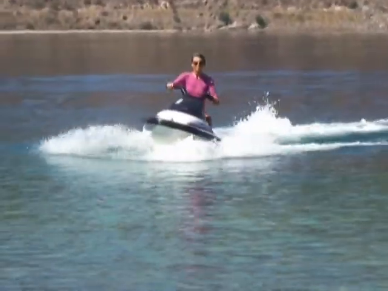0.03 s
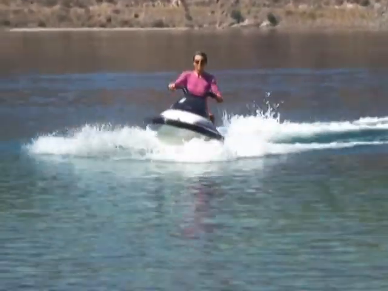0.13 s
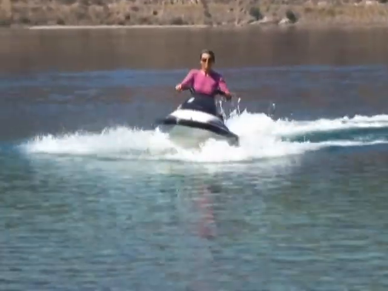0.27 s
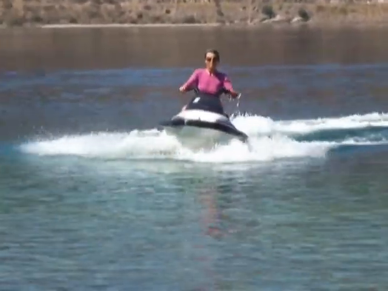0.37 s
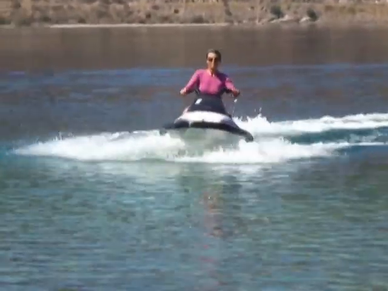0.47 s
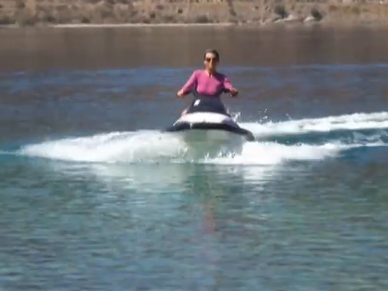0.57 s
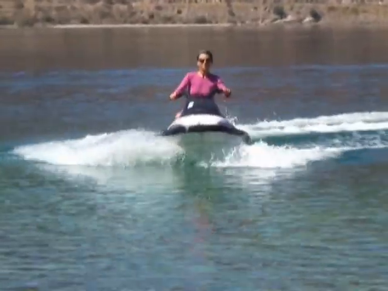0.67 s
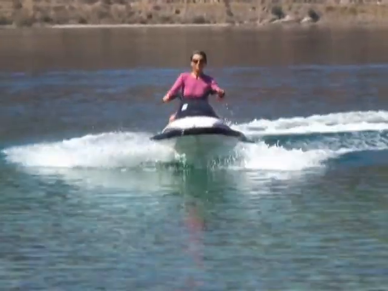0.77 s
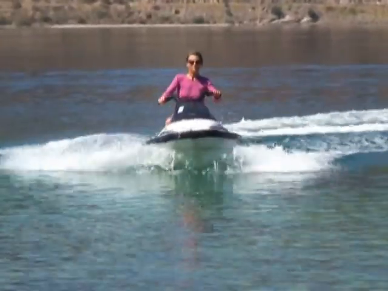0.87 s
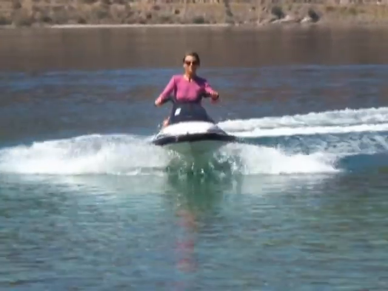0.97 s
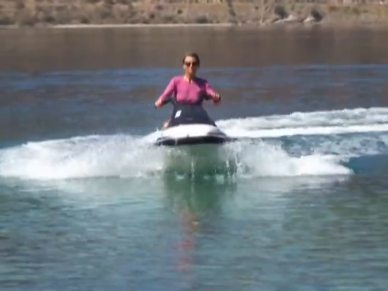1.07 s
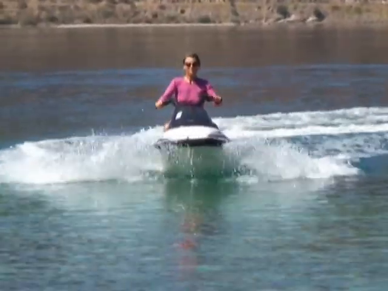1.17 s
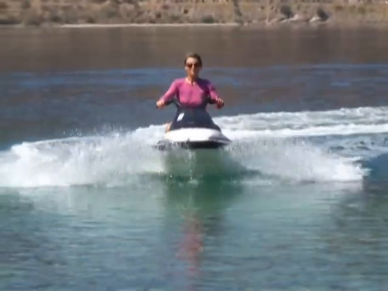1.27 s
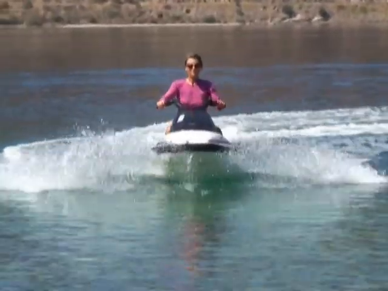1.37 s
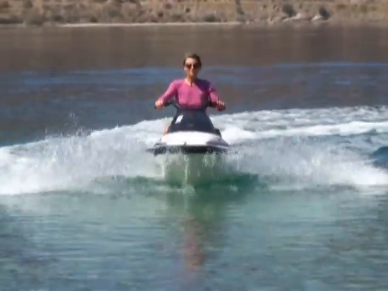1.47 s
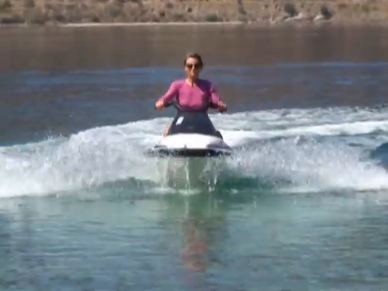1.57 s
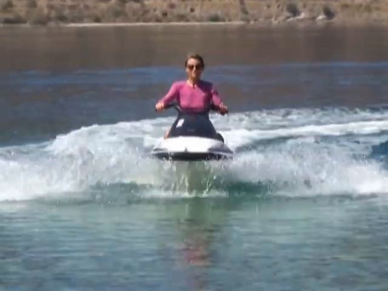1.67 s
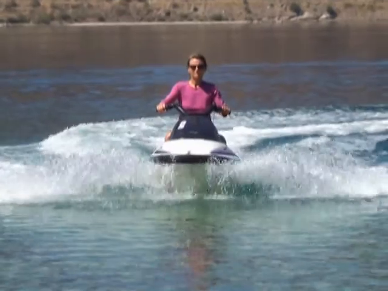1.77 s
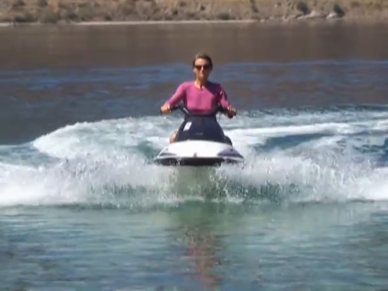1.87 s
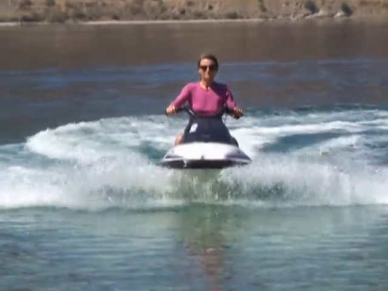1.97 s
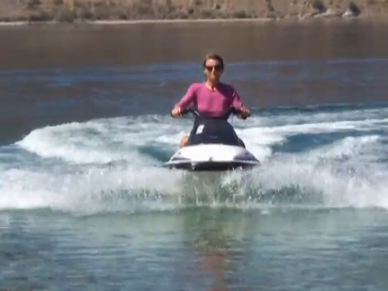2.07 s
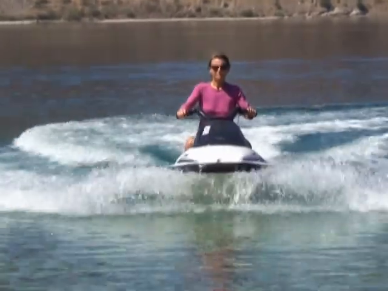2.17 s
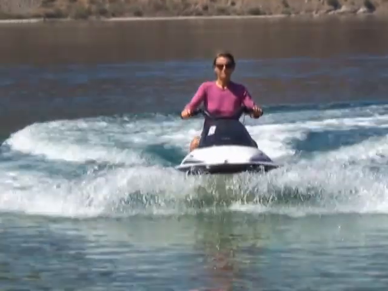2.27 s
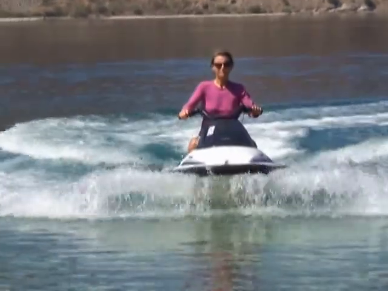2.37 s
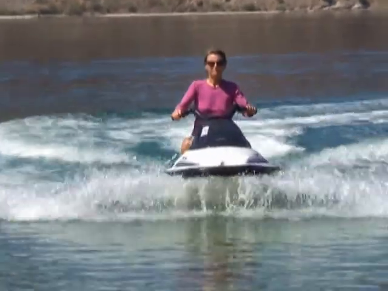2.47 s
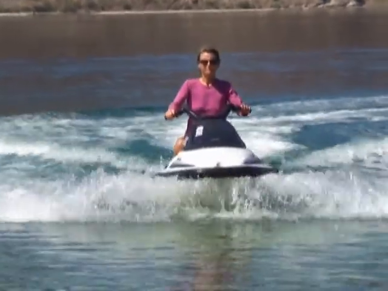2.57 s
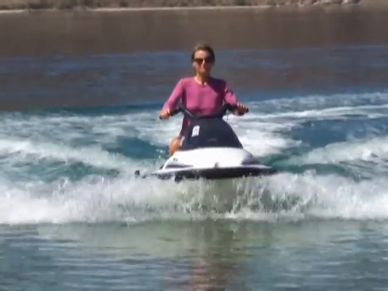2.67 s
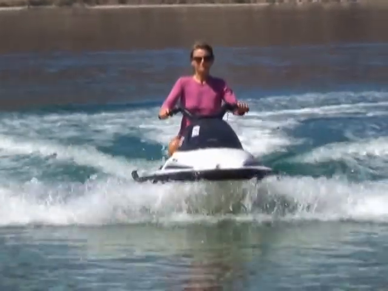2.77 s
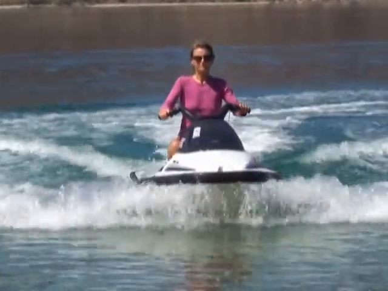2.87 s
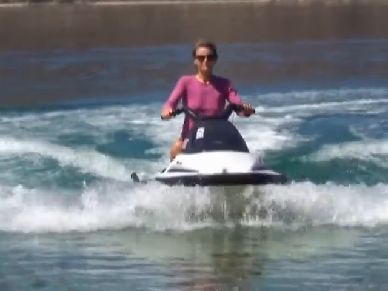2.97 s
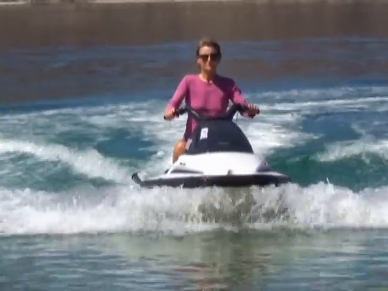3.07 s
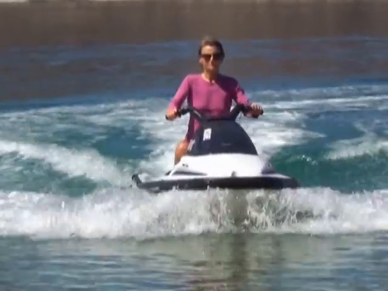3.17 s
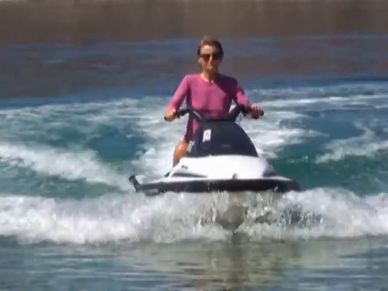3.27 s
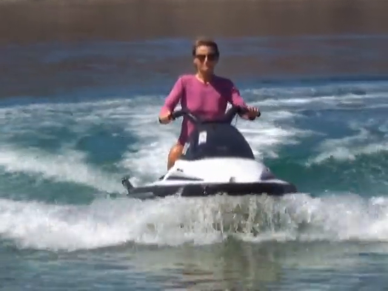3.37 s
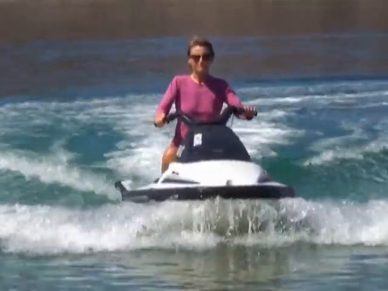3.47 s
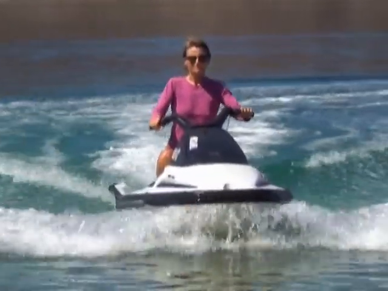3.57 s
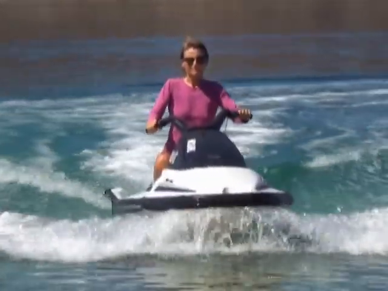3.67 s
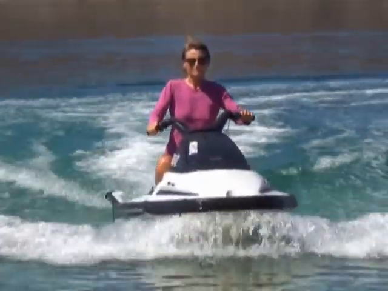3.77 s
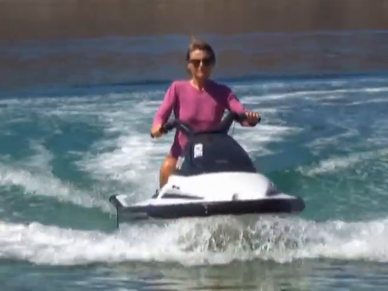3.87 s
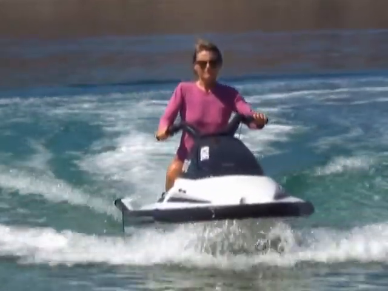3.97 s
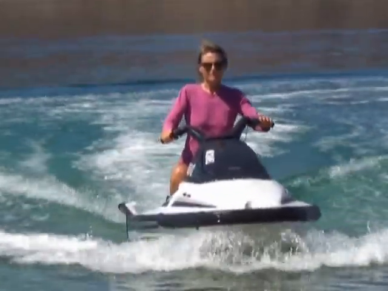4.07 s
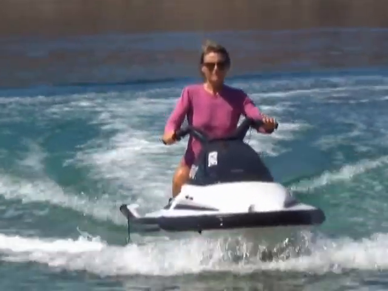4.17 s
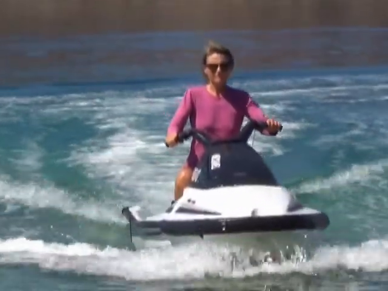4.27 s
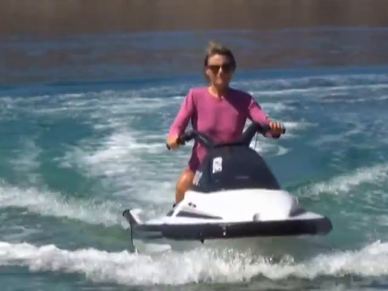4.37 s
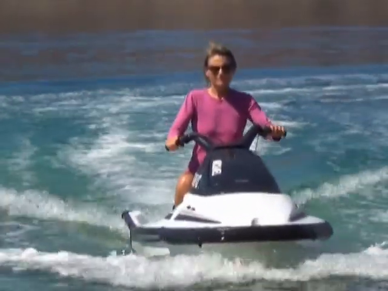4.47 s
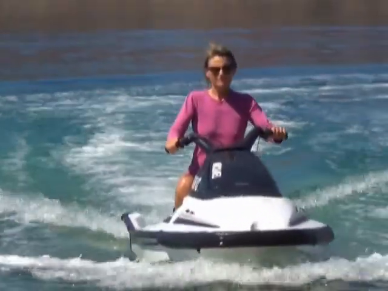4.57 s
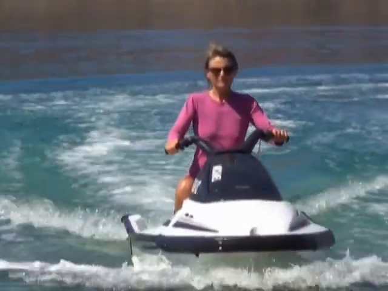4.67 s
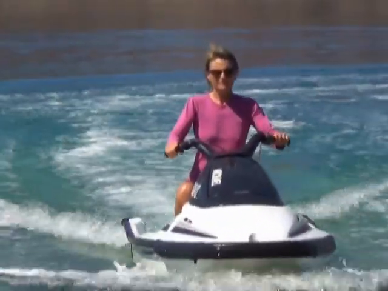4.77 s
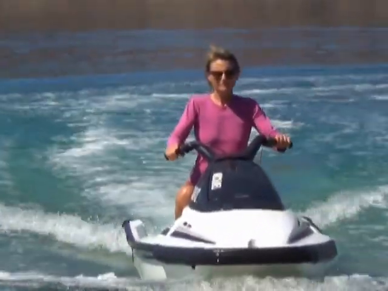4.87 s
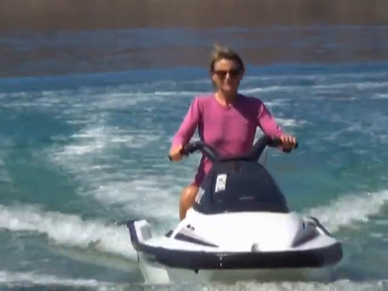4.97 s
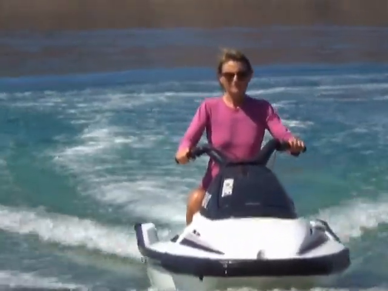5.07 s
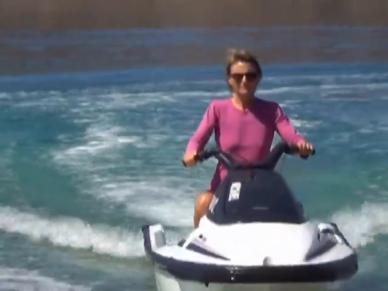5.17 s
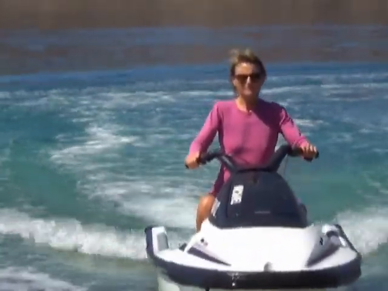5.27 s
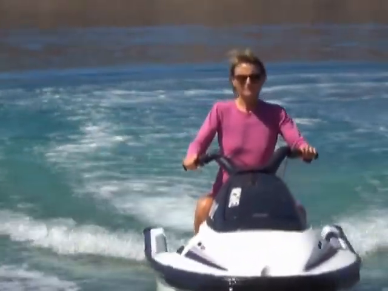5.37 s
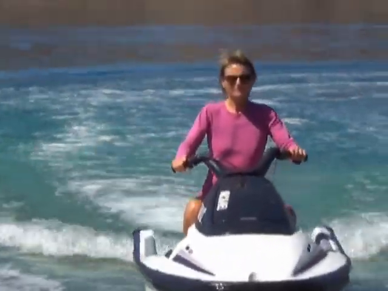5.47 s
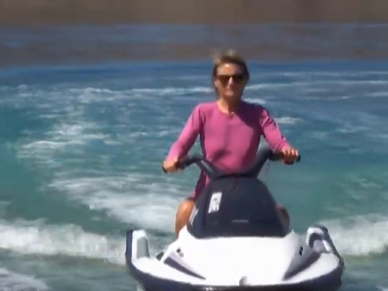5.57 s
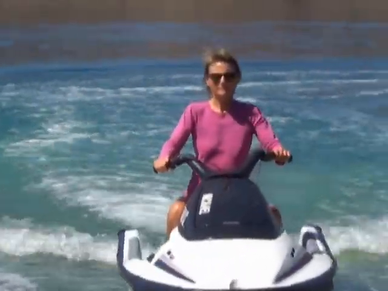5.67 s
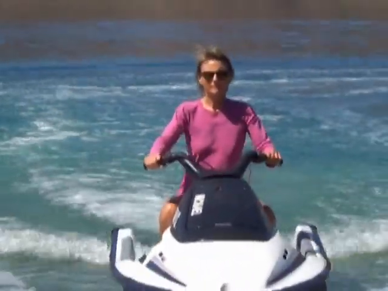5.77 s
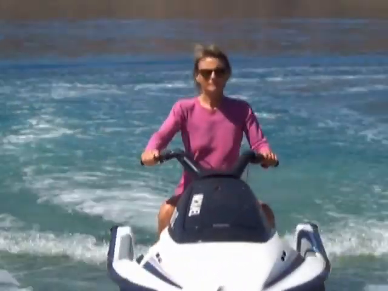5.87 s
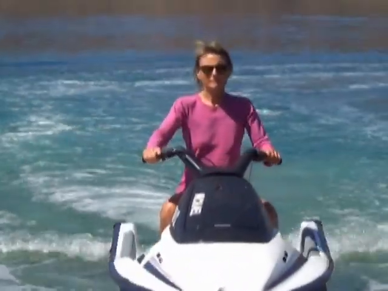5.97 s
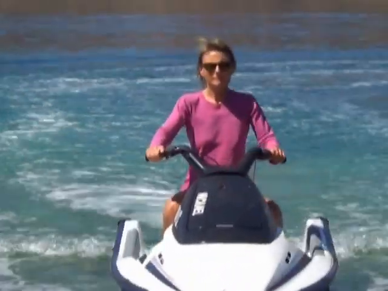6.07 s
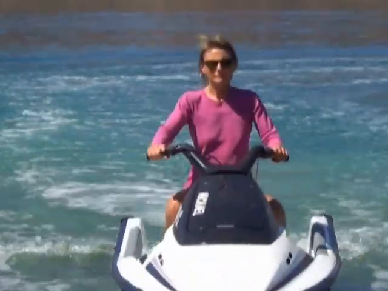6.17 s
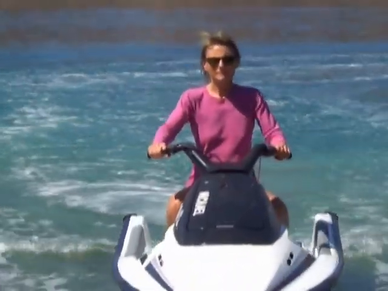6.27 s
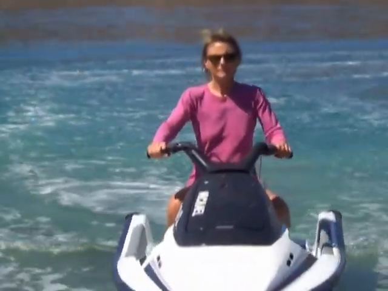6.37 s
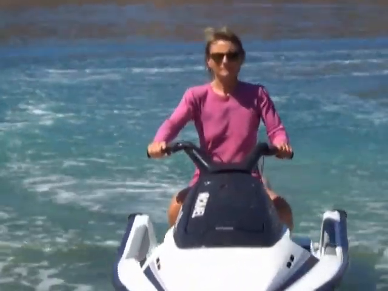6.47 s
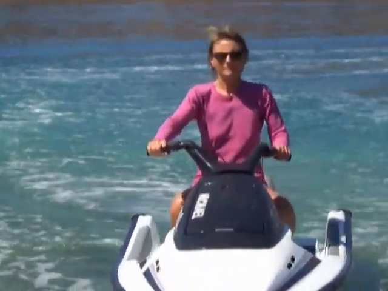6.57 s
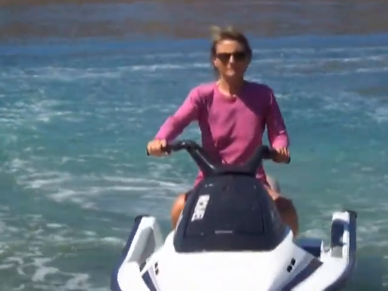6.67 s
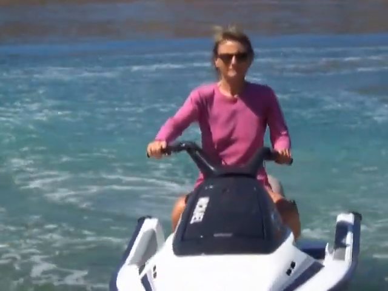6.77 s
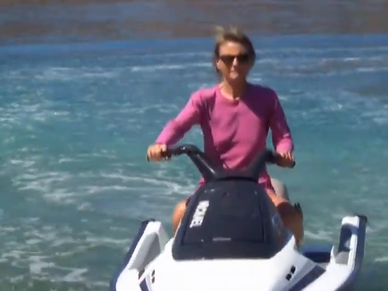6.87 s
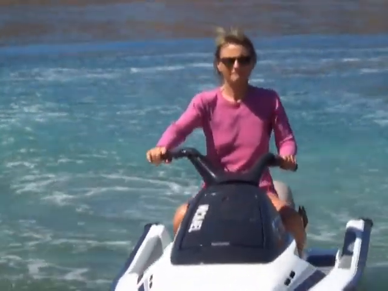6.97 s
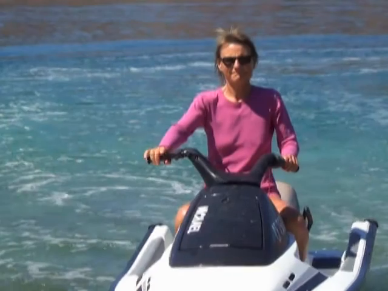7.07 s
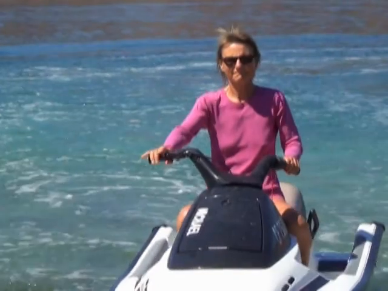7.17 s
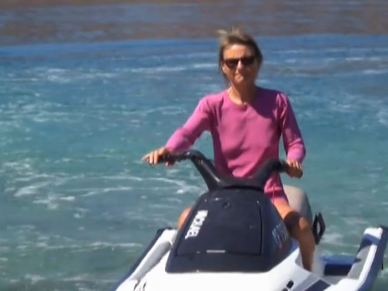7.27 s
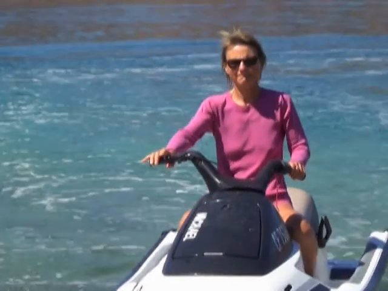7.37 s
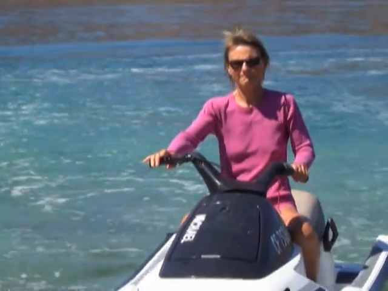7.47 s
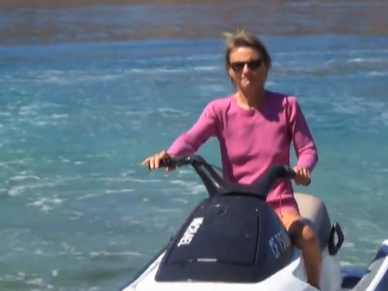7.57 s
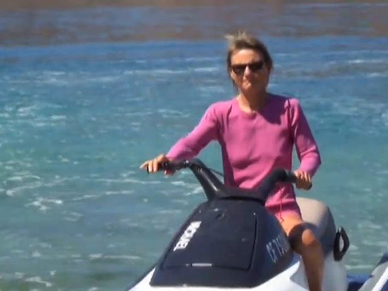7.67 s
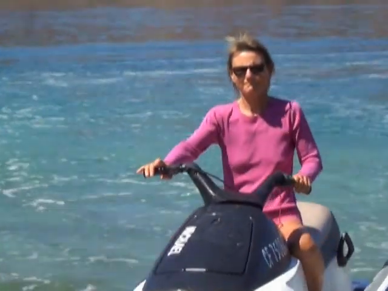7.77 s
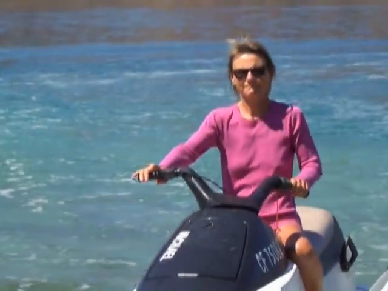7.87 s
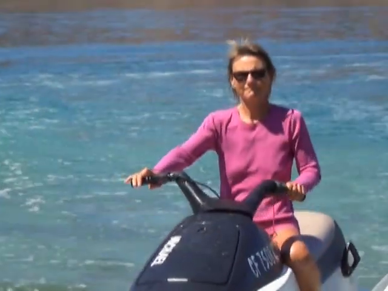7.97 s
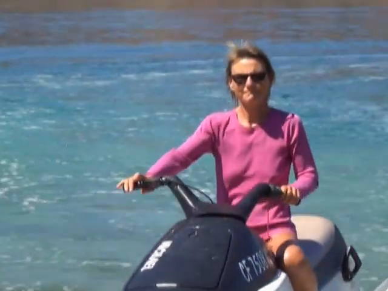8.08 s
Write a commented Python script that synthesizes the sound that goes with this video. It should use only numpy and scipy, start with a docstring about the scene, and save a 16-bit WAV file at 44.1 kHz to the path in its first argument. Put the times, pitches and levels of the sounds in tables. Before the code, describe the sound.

Raspy watercraft engine drone and rushing spray approach, the throttle closes to stumbling chugs, then the engine stops and quiet water bloops and ticks.

```python
"""A small two-stroke watercraft ploughs toward the microphone on a lake, then its throttle closes:
the exhaust, pulses ringing two pipes, breaks into uneven thumps and dies. Hull, cover and shaft sound along.
Dying sines and noise bursts make the wake's laps, knocks, bubbles and ticks; shaped noise makes
spray, churned water, lapping and slosh. Once a second the sound drops and fades back in."""
import sys
import numpy as np
from scipy import signal
from scipy.fft import rfft, irfft
from scipy.io import wavfile
from scipy.ndimage import uniform_filter1d

SR = 44100
rng = np.random.default_rng(int(sys.argv[2]) if len(sys.argv) > 2 else 0)


def put_to_file(sound):
    """Save the sound as 16-bit audio at rate SR, in the file named by the first command-line argument."""
    columns = np.atleast_2d(sound).T  # one column per channel
    safe = np.clip(columns, -1, 1)
    whole_steps = np.round(safe * 32767)
    wavfile.write(sys.argv[1], SR, whole_steps.astype(np.int16))


N = 358091
SKIP_S, SKIP_BACK_S = 0.7741, 0.0081  # first dropout; engine time replayed at each


def gain_of(db):
    """Decibels to amplitude."""
    return 10 ** (np.asarray(db) / 20)


def evened(x):
    """Scales to rms 1."""
    return x / np.sqrt(np.mean(abs(x) ** 2) + 1e-20)


def smoothed(x, span):
    """Two running means, then rms 1: a slow random drift."""
    return evened(uniform_filter1d(uniform_filter1d(x, span), span))


def follow(points, x):
    """Reads a two-column table at x, linearly."""
    return np.interp(x, *np.transpose(points))


def read(points, hz):
    """Reads a spectrum on a log-frequency axis."""
    f, value = np.transpose(points)
    return np.interp(np.log(hz + 1), np.log(f + 1), value)


def add(mix, s, sound):
    """Mixes a sound in at a time."""
    part = mix[round(s * SR):][:len(sound)]
    part += sound[:len(part)]


def causal(db):
    """Minimum-phase impulse response of a dB curve given from 0 to half the sample rate."""
    mirrored_db = np.r_[db, db[-2:0:-1]]
    log = np.log(gain_of(np.maximum(mirrored_db, -100)))
    return np.fft.ifft(np.exp(np.conj(signal.hilbert(log)))).real[:4096]


def coloured(x, db):
    """Passes x through a causal filter of energy 1."""
    ring = causal(db)
    return signal.oaconvolve(x, ring / np.linalg.norm(ring))[:N]


# Engine run. Each row: time in seconds, firing rate in Hz, exhaust level in dB,
# upper pipe against lower pipe in dB.
ENGINE_RUN = [(0.0, 110.7, -22.5, 0), (0.239, 108.4, -19.5, 4), (0.358, 110.4, -15, 2),
              (0.49, 114.3, -12, 5), (0.668, 112.7, -14.5, 2), (0.86, 113.4, -13.5, 2),
              (1.081, 97.3, -21.5, 1), (1.27, 97.5, -15.5, 4), (1.44, 97.3, -14.5, 3), (1.64, 97.1, -18, 2),
              (1.809, 96.55, -13.5, 3), (1.9, 92.74, -12, 3.5), (2.27, 88.1, -15, 1.5),
              (2.37, 91.3, -15.5, 3.5), (2.56, 89.55, -14.5, 3.5), (2.88, 86.66, -15, 4),
              (2.97, 76.66, -20.5, 4.5), (3.03, 72.4, -16.5, 1), (3.16, 62.2, -22.5, 5.5),
              (3.4, 55.17, -24.5, -2), (3.56, 53.37, -23.5, -4), (3.68, 52.2, -25, -1),
              (3.89, 53.76, -21, 0), (4.05, 52.04, -31.5, 2), (4.27, 49.9, -21, 3), (4.42, 50.94, -25, 3),
              (4.66, 52.46, -21.5, 3), (4.95, 50.65, -22.5, 3), (5.08, 45.1, -23.5, 2),
              (5.159, 39.76, -32, 3), (5.5, 39.5, -50, 3)]
# Waves covering the outlet. Each row: start in seconds, end in seconds, depth in dB.
DUNKS = [(3.205, 3.394, -13.5), (4.056, 4.249, -13)]
DUNK_EDGE_S = 0.015
SURGE_DB, SURGE_S = (0.95, 1.5), 0.025  # rms surge on and off the throttle; smoothing span


def engine():
    """Each firing is a pressure pulse that rings exhaust, hull and cover; the shaft hums below."""
    s, *columns = np.transpose(ENGINE_RUN)
    t = np.arange(N) / SR * (1 + SKIP_BACK_S)  # the replayed milliseconds stretch the clock
    hz, level_db, upper_db = (np.interp(t, s, c) for c in columns)
    sunk = np.clip((80 - hz) / 26.82, 0, 1)  # 0 on the throttle, 1 off it
    for start, end, depth_db in DUNKS:
        level_db = level_db + depth_db * np.clip(np.minimum(t - start, end - t) / DUNK_EDGE_S, 0, 1)
    surge = smoothed(rng.standard_normal(N), round(SURGE_S * SR))
    level_db = level_db + np.interp(sunk, [0, 1], SURGE_DB) * surge

    pulses, steady = firings(hz)
    fired = exhaust(pulses, sunk, upper_db) * gain_of(level_db)
    fired = fired + hull_thud(pulses, hz, level_db) + cover_whine(steady, hz)
    same_loudness = np.sqrt(SR / hz)  # cancels the power gained by firing faster
    stop = np.interp(t, [s[-1] - 0.1, s[-1]], [1, 0])
    out = shaft_hum(hz, t) + fired * same_loudness * stop

    n = np.arange(N)
    skips = np.floor(n / SR + 1 - SKIP_S).astype(int)
    return out[n - skips * round(SKIP_BACK_S * SR)]  # once a second a few milliseconds play again


STUMBLE_HZ = (75.5, 90.5)  # stumbling fades in from the upper to the lower firing rate
EVEN, UNEVEN = 1.18, 4.5  # scatter of firing size and time, above and below STUMBLE_HZ
MISFIRE, MISFIRE_DB = 0.13, -9  # share of weak firings off the throttle, and how weak


def firings(hz):
    """Two cylinders fire in turn: pulses of scattered size and time, and a steadier train."""
    count = np.floor(np.cumsum(hz / SR))
    at = np.flatnonzero(np.diff(count) > 0)
    size, late, burp, lag = rng.standard_normal((len(at), 4)).T
    weak = rng.random(len(at)) < np.interp(hz[at], STUMBLE_HZ, [MISFIRE, 0])
    uneven = np.interp(hz[at], STUMBLE_HZ, [UNEVEN, EVEN])
    pair_db = 0.36 * (-1) ** count[at]  # the two cylinders differ

    steady = np.zeros(N)
    steady[at + (0.00004 * SR * lag).astype(int)] = gain_of(pair_db + 1.7 * burp)
    pulses = np.zeros(N + SR)
    fired = at + (0.00011 * SR * uneven * late).astype(int)
    size_db = pair_db + MISFIRE_DB * weak + 0.7 * uneven * np.tanh(size)
    np.add.at(pulses, fired, gain_of(size_db))
    # gas trapped under water escapes between firings, more when they are uneven
    escape = fired + ((0.00676 + 0.0021 * lag) * SR).astype(int)
    np.add.at(pulses, escape, -0.1 * uneven * (0.67 + burp))
    return pulses, steady


# Exhaust under the hull. Each row: frequency in Hz, relative density in dB per Hz.
EXHAUST = [(60, -66), (110, -47), (135, -3.5), (165, 3), (190, 6.5), (212, 3), (240, 5), (270, 6),
           (300, -4), (340, -26), (450, -21), (900, -69)]
# Sunken outlet, off the throttle. Each row: frequency in Hz, relative density in dB per Hz.
SUNK = [(60, -34.5), (110, -33), (146, -1.5), (178, 1.5), (208, 6), (240, 1.5), (273, 3), (333, -15.5),
        (425, -9), (490, -25), (700, -28), (1100, -60.5)]


def exhaust(pulses, sunk, upper_db):
    """Pulses ring a lower and an upper pipe; off the throttle the outlet sinks and rings in one hump."""
    f = np.fft.rfftfreq(16384, 1 / SR)
    lower = coloured(pulses, read(EXHAUST, f))
    upper = coloured(pulses, read(EXHAUST, f) + 6 * np.tanh((f - 232) / 45.0))
    share = np.clip(upper_db / 6, -1.5, 1.5)  # moves weight from the lower to the upper pipe
    planing = lower + share * (upper - lower)
    return (1 - sunk) * planing + sunk * coloured(pulses, read(SUNK, f))


# Hull resonance. Each row: frequency in Hz, relative density in dB per Hz.
HULL = [(30, -42), (50, -20), (75, -1), (100, 2.5), (120, 1.5), (150, -5), (250, -70)]
# Hull thud. Each row: firing rate in Hz, level against the exhaust in dB.
THUD_LEVEL = [(40, -11), (52, -18.5), (89, -28), (97, -23.5), (113, -24)]


def hull_thud(pulses, hz, level_db):
    """The firings shake the hull's low resonance, at a level following the exhaust."""
    f = np.fft.rfftfreq(16384, 1 / SR)
    return coloured(pulses, read(HULL, f)) * gain_of(level_db + follow(THUD_LEVEL, hz))


# Engine cover resonance. Each row: frequency in Hz, relative density in dB per Hz.
COVER = [(250, -35.5), (310, -6), (340, 0), (400, 2.5), (450, -6), (490, -2), (580, -9), (680, -7),
         (730, -3.5), (800, -16), (950, -16.5), (1400, -45.5)]
# Cover whine. Each row: firing rate in Hz, level in dB.
WHINE_LEVEL = [(39, -51), (50, -41.5), (90, -36.5), (96, -29.5), (113, -27.5)]


def cover_whine(steady, hz):
    """The cover sings the higher multiples of the firing rate, the more the faster it runs."""
    f = np.fft.rfftfreq(16384, 1 / SR)
    return coloured(steady, read(COVER, f)) * gain_of(follow(WHINE_LEVEL, hz))


# Shaft hum. Each row: time in seconds, rms level in dB.
SHAFT_LEVEL = [(0, -62), (1, -63), (2, -58), (2.9, -52), (3.3, -65), (3.6, -87)]


def shaft_hum(hz, t):
    """The crankshaft turns once for two firings: a sine at half the firing rate."""
    return gain_of(follow(SHAFT_LEVEL, t)) * np.sqrt(2) * np.sin(np.pi * np.cumsum(hz / SR))


def bubble(hz, t60_s, rise_per_s, soft_s):
    """A dying sine whose pitch climbs, where rise is set, as the bubble nears the surface."""
    t = np.arange(round(t60_s * SR) + 50) / SR
    envelope = gain_of(-60 * t / t60_s) * (1 - np.exp(-t / soft_s))
    return envelope * np.sin(2 * np.pi * hz * t * (1 + rise_per_s * t))


def snap(hz, octaves, t60_s, noise):
    """A burst of noise in a band, with a sudden start."""
    edges_hz = np.clip(hz * 2 ** (np.array([-0.5, 0.5]) * octaves), 500, 15000)
    band = evened(signal.lfilter(*signal.butter(2, edges_hz, "bandpass", fs=SR), noise))
    return band * gain_of(-60 * np.arange(len(noise)) / SR / t60_s) / 2


# Bubbles and laps at the hull. Each row: start in seconds, level in dB, starting pitch in Hz.
BLOOPS = [(4.16, -22, 1300), (5.02, -18.5, 431.2), (5.877, -25, 590), (6.37, -41, 1010), (6.641, -29, 574),
          (6.676, -33, 540), (6.812, -35, 940), (6.986, -34.5, 1190), (7.195, -32, 1490),
          (7.293, -29.5, 554), (7.331, -34, 1330), (7.619, -35, 1530), (7.58, -41, 520), (7.669, -41, 680),
          (7.729, -37, 510), (7.762, -36, 1520), (7.933, -33.5, 1190), (7.99, -33.5, 475), (8.04, -42, 520),
          (8.06, -35.5, 1100)]
BLOOP_T60_S, SPLASH_DB, SPLASH_T60_S = 0.044, -2.5, 0.058


def laps_at_hull():
    """Each lap is a rising bubble, a soft noise splash and five smaller bubbles."""
    out = np.zeros(N)
    swell = 1 - np.exp(-np.arange(3000) / SR / 0.005)  # a splash starts softly
    for (s, db, hz), swarm in zip(BLOOPS, rng.random((len(BLOOPS), 5, 2))):
        add(out, s, gain_of(db) * bubble(hz, BLOOP_T60_S, 5.9, 0.0017))
        splash = snap(1600, 1.5, SPLASH_T60_S, rng.standard_normal(3000)) * swell
        add(out, s, gain_of(db + SPLASH_DB) * splash)
        for wait, higher in swarm:
            small = bubble(hz * (0.785 + 1.18 * higher), 0.5 * BLOOP_T60_S, 13.0, 0.0016)
            add(out, s + 0.02 * wait, gain_of(db - 7.0) * small)
    return out


# Low knocks of waves on the hull and last chugs. Each row: start in seconds, level in dB, pitch in Hz.
KNOCKS = [(5.219, -19, 232), (5.304, -20, 258), (5.38, -29, 271), (5.795, -28, 215), (6.438, -23.5, 155),
          (6.643, -33, 285), (6.807, -32, 146), (7.014, -28, 245), (7.289, -31, 225), (7.479, -34, 170)]
KNOCK_T60_S = 0.095


def knocks():
    """Low dying sines of fixed pitch with a soft start."""
    out = np.zeros(N)
    for s, db, hz in KNOCKS:
        add(out, s, gain_of(db) * bubble(hz, KNOCK_T60_S, 0, 0.0072))
    return out


# Drops and small snaps close by. Each row: start in seconds, snap level in dB, centre in Hz,
# width in octaves, ring level in dB.
TICKS = [(4.896, -24, 8780, 0.61, -40), (5.0143, -18, 2540, 0.73, -34), (5.015, -23, 9200, 0.75, -45),
         (5.095, -22.5, 7900, 0.67, -40), (5.2116, -16, 6394, 1.33, -8.5), (5.9035, -38, 6040, 1.3, -30),
         (6.6772, -33, 7000, 1.12, -37), (7.107, -31, 6100, 1.3, -36), (7.231, -28, 11100, 0.56, -38),
         (7.442, -18.5, 7450, 3.1, -44), (7.451, -22, 8550, 1.3, -36), (7.7023, -27, 11500, .8, -40),
         (7.8805, -34, 8450, 1.1, -36)]
TICK_T60_S = 0.016


def ticks():
    """Short band-noise snaps, each with a ring at its centre frequency."""
    out = np.zeros(N)
    for s, db, hz, octaves, ring_db in TICKS:
        add(out, s, gain_of(db) * snap(hz, octaves, TICK_T60_S, rng.standard_normal(1500)))
        add(out, s, gain_of(ring_db) * bubble(hz, 0.92 * TICK_T60_S, 0, 0.00025))
    return out


def foam():
    """Bursting foam: 70 tiny high snaps at random times from 5 to 7.7 s."""
    out = np.zeros(N)
    for s, high, loud in rng.random((70, 3)):
        burst = snap(4000 + 8000 * high, 0.7, 0.0071, rng.standard_normal(500))
        add(out, 5 + 2.7 * s, gain_of(-35 + 8.9 * loud) * burst)
    return out


def gurgle():
    """About 160 small bubbles a second of random size, in 24 pitches; the higher, the shorter."""
    out = np.zeros(N)
    size = gain_of(4.6 * np.minimum(rng.exponential(1, N), 5)) * (rng.random(N) < 160 / SR)
    kind = rng.integers(0, 24, N)
    for k, hz in enumerate(np.geomspace(1000, 6000, 24)):
        ring = bubble(hz, 50 / hz, 7.4, 0.0014)
        out += gain_of(-56) * signal.oaconvolve(size * (kind == k), ring)[:N]
    return out


def wake():
    """Sums the near sounds; ripples scatter them a little to the sides as a short noise tail."""
    near = laps_at_hull() + knocks() + ticks() + foam() + gurgle()
    taps = rng.standard_normal(600) * gain_of(-60 * np.arange(600) / SR / 0.035)
    side = gain_of(-24) * signal.oaconvolve(near, taps / np.linalg.norm(taps))[:N]
    return near + np.array([side, -side])


# Water levels. Each row: time in seconds, spray in dB, churned water in dB.
WATER_LEVELS = [(0.0, -35, -31), (0.9, -34, -31), (1.38, -30, -30.5), (1.9, -28.5, -29.5),
                (2.89, -27.5, -29), (3.82, -29, -29.5), (4.21, -34, -30), (4.95, -39, -33.5),
                (5.13, -42, -37.5), (5.81, -44, -39), (6.28, -49, -47), (6.96, -48.5, -53.5),
                (8.12, -50.5, -55)]
# The wake reaches the shallows. Each row: time in seconds, lapping in dB.
LAPPING_LEVEL = [(4.5, -51), (5.5, -42), (6.2, -46), (7.0, -52), (7.6, -49.5), (8.12, -51)]
# Spray, churn and lapping spectra. Each row: frequency in Hz, relative density in dB per Hz.
SPRAY = [(1060, -62), (1800, -1.5), (2310, 3), (2670, -0.5), (2920, 3), (3190, 2), (3960, 3.5),
         (4860, -3.5), (5870, 4.5), (8400, -1.5), (10100, 1), (11500, -3.5), (14400, -5.5), (15300, -25.5)]
CHURN = [(210, -9.5), (360, 0.5), (418, -6), (489, 2), (637, -1.5), (817, -3.5), (2010, -10), (2600, -12),
         (3380, -33), (5720, -120)]
LAPS = [(190, -38), (330, 11), (447, -25), (577, 4), (782, -61), (1180, 10), (3040, -1), (4250, -10),
        (8180, -2), (11100, -3.5), (13800, -9), (15000, -72)]
# Stereo likeness. Each row: frequency in Hz, left-right correlation from 0 to 1.
LIKENESS = [(300, 0.99), (600, 0.93), (1200, 0.99), (2500, 1), (5000, 0.99), (9000, 0.95), (15000, 1)]


def water():
    """Random short-time spectra: spray, churn and lapping, with drifting patches and flicker."""
    frames, hz = N // 128 + 5, np.fft.rfftfreq(512, 1 / SR)
    bins_hz = hz[:, None]
    a, b, c, d, patches = rng.standard_normal((frames, 257, 5)).T
    patches = evened(uniform_filter1d(uniform_filter1d(patches, 14, 0), 9, 1))
    flicker = evened(uniform_filter1d(rng.standard_normal(frames), 6))
    drift = patches + 0.5 * flicker
    t = np.arange(frames) * 128 / SR
    s, *levels = np.transpose(WATER_LEVELS)
    spray_db, churn_db = (np.interp(t, s, level) for level in levels)

    layers = [(SPRAY, spray_db, 0.7), (CHURN, churn_db, 1.2),
              (LAPS, follow(LAPPING_LEVEL, t), 2.7 / (1 + (bins_hz / 3500) ** 2))]
    power = 0
    for colour, level_db, patchy_db in layers:
        shape = evened(gain_of(read(colour, hz)))[:, None]
        power = power + (shape * gain_of(level_db + patchy_db * drift)) ** 2
    # from afar, in the first 2 s, the air dulls the treble
    octaves_up = np.log2((bins_hz + 100) / 6000).clip(0)
    air_db = 0.79 * octaves_up * (np.minimum(spray_db + 31.0, 0) * (t < 2))
    power = power * gain_of(air_db) ** 2

    same, left = np.clip(read(LIKENESS, hz), -1, 1)[:, None], a + 1j * b
    pair = np.array([left, same * left + np.sqrt(1 - same ** 2) * (c + 1j * d)])
    norm = np.std(signal.istft(left, nperseg=512, noverlap=384)[1])
    return signal.istft(pair * np.sqrt(power), nperseg=512, noverlap=384)[1][:, :N] / norm


# Slosh spectrum. Each row: frequency in Hz, relative density in dB per Hz.
SLOSH = [(18, -56), (30, -39), (48, -4), (86, 0), (151, 7), (177, 7.5), (216, 8.5), (400, -8), (520, -52),
         (880, -120)]
# Slosh level. Each row: time in seconds, level in dB.
SLOSH_LEVEL = [(0, -51), (.9, -43), (2.9, -33), (3.8, -34.5), (4.2, -33), (4.95, -28.5), (5.15, -37),
               (5.8, -49), (7, -48), (8.12, -51)]


def slosh():
    """Low noise, nearly alike left and right, swells in random lumps."""
    a, b = rng.standard_normal((N, 2)).T
    low = np.array([a, 1.05 * a + 0.2 * b])
    low = evened(irfft(rfft(low) * gain_of(read(SLOSH, np.fft.rfftfreq(N, 1 / SR))), N))
    lumps = smoothed(rng.standard_normal(N), 1500)
    return low * gain_of(follow(SLOSH_LEVEL, np.arange(N) / SR) + 2.0 * lumps)


def scene():
    """Engine in the middle, wake just around it, water nearly alike left and right."""
    return engine() + wake() + water() + slosh()


# Microphone pair. Each row: frequency in Hz, left minus right in dB.
LEAN = [(30, 3), (60, 3), (105, 11), (150, 2), (200, 0.5), (270, -1), (340, -4), (450, -0.5), (1000, 2.5),
        (2000, -2.8), (5000, 0.13), (15000, 0.5)]
EDGE_HZ, LOW_CUT_HZ, FADE_IN_S = 15200, 42, 0.0058


def record(dry):
    """The pair leans left in the bass, cuts rumble and top; each second the sound drops and fades in."""
    hz = np.fft.rfftfreq(N, 1 / SR)
    ratio = gain_of(read(LEAN, hz))
    sides = np.array([2 * ratio / (1 + ratio), 2 / (1 + ratio)])
    low_cut = 1 / np.sqrt(1 + (LOW_CUT_HZ / (hz + 1)) ** 8)
    x = irfft(rfft(dry) * low_cut * sides, N)
    since_s = (np.arange(N) / SR - SKIP_S) % 1
    x = x * np.clip(since_s / FADE_IN_S, 0, 1)
    top_cut = signal.firwin(511, EDGE_HZ, window=("kaiser", 9), fs=SR)
    return signal.oaconvolve(x, top_cut[None], "same")


dry = scene()
out = record(dry)
put_to_file(out)
```